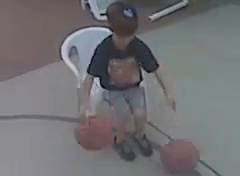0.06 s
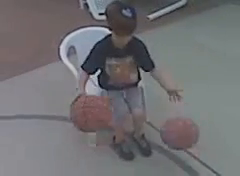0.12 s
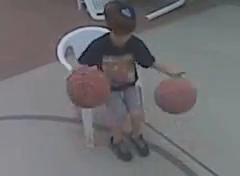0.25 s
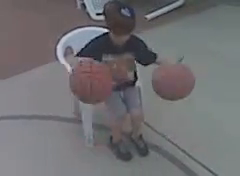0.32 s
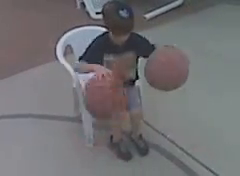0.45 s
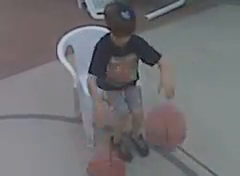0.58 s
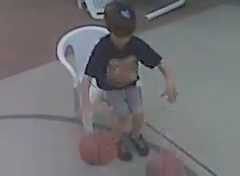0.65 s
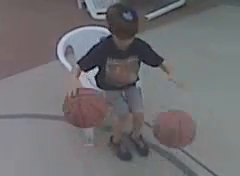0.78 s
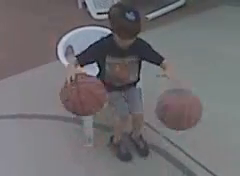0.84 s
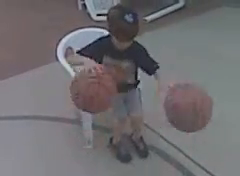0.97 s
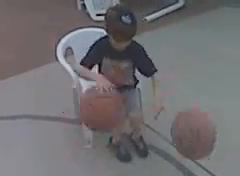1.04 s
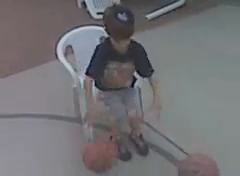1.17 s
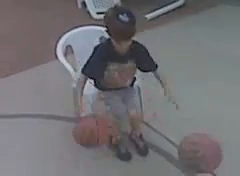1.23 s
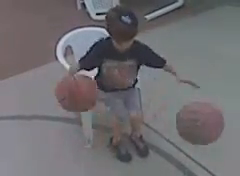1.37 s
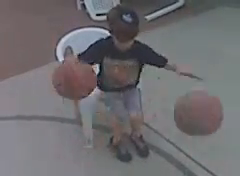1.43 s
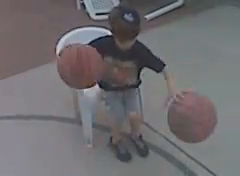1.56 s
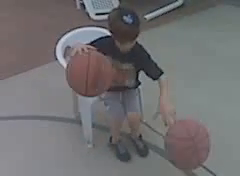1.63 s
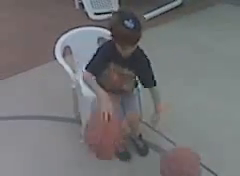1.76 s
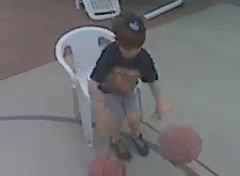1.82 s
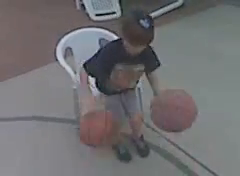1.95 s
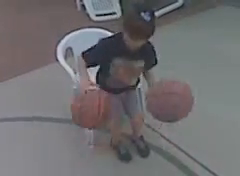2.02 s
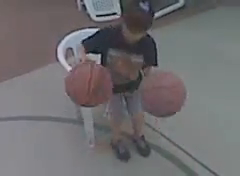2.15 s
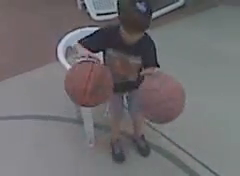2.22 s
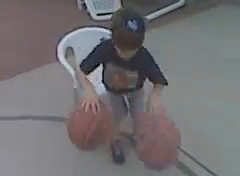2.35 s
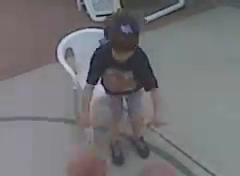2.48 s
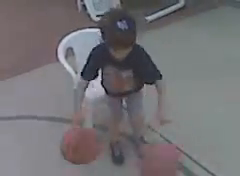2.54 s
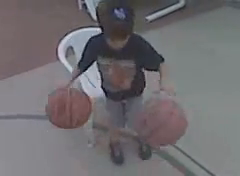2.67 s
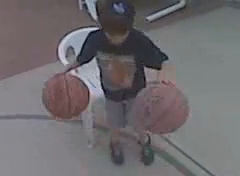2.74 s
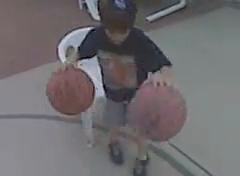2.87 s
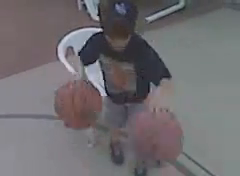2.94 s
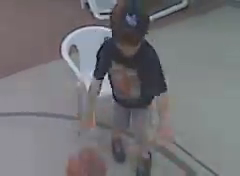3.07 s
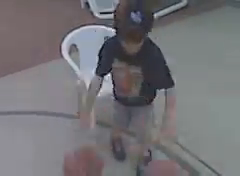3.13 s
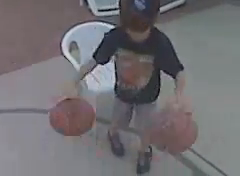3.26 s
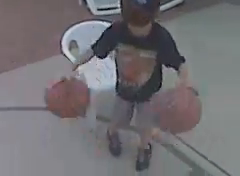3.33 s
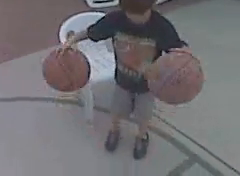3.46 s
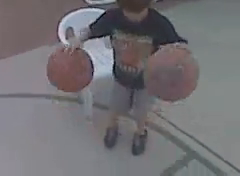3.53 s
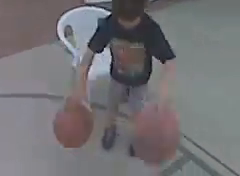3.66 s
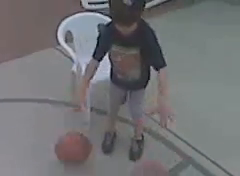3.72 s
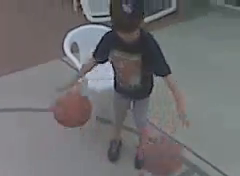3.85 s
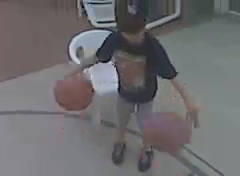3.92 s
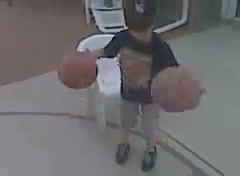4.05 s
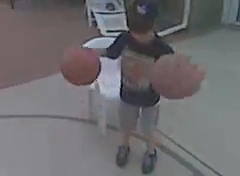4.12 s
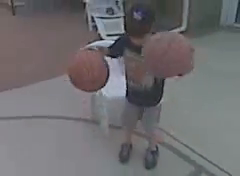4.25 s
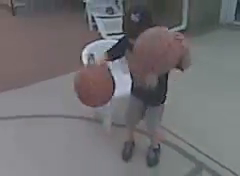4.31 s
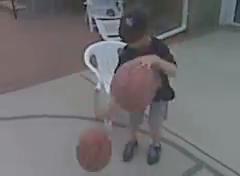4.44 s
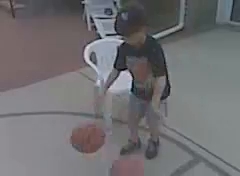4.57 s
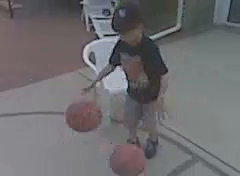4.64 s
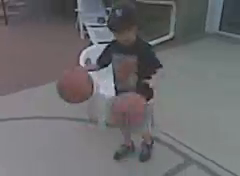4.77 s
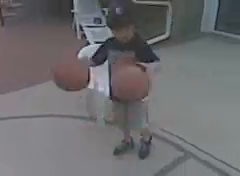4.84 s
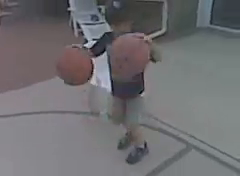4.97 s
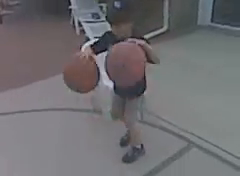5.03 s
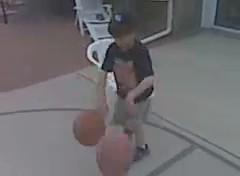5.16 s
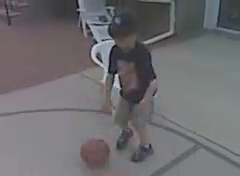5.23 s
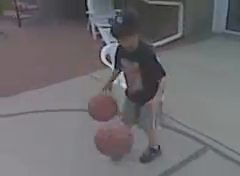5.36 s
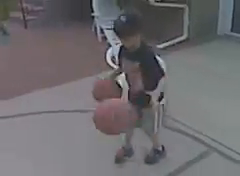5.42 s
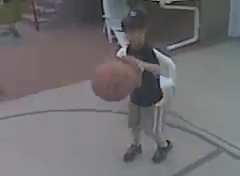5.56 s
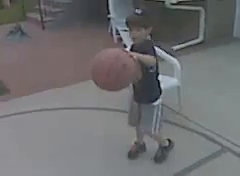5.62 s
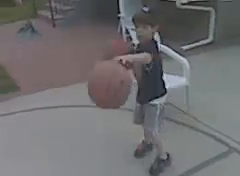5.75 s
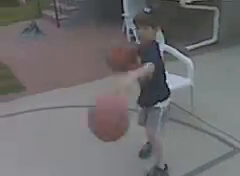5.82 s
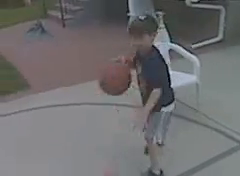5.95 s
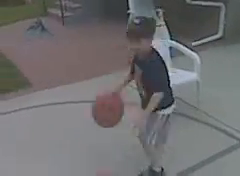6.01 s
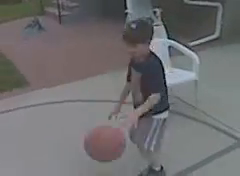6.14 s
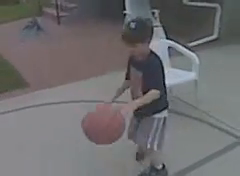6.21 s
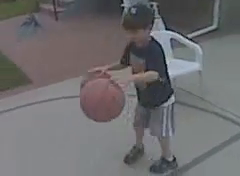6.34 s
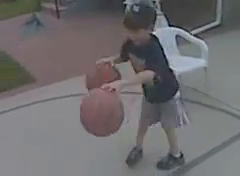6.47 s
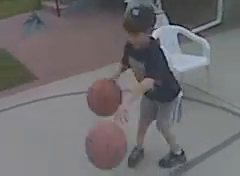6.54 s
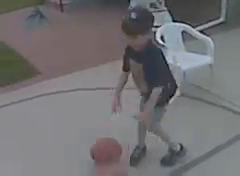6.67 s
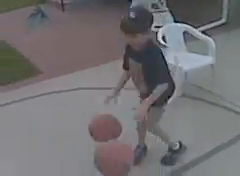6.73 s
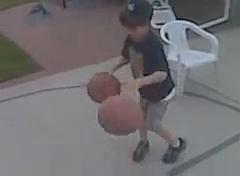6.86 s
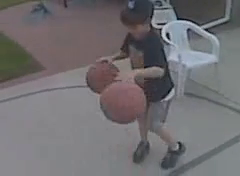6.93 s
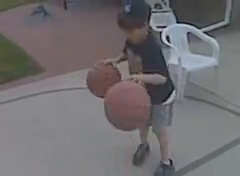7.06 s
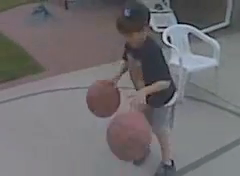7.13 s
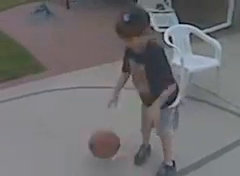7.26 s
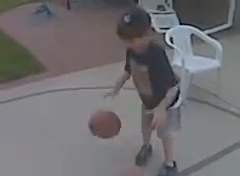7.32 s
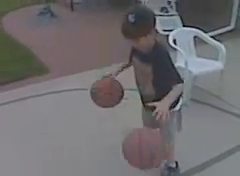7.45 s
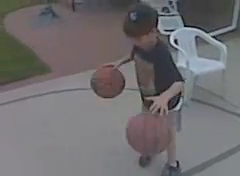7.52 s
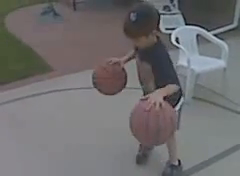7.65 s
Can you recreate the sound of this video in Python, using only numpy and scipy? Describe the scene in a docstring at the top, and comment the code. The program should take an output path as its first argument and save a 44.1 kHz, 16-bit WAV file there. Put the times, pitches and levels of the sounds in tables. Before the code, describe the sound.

Two basketballs are dribbled close by on outdoor concrete, landing almost together in a steady rhythm. Each bounce is a sharp slap with a thump, a hollow ring and a quick echo off nearby walls. After a couple of seconds, hands and shoes scuff between bounces and a distant bird whistles faintly over a soft hush. The small microphone sounds narrow and telephone-like, overloading on the loudest hits.

```python
"""Sharp, ringing bounces, close by: a child dribbles two basketballs on concrete beside a house.
Each one cracks as rubber slaps the ground, thumps as the shell flexes and rings in the air inside;
walls throw it back and the yard rings on. Hands and shoes scuff between bounces, and faint blips
and a whistling bird carry from far off over an outdoor hush. The narrow-band recorder overloads
on the loudest cracks."""
import sys
import numpy as np
from scipy import signal
from scipy.fft import rfft, irfft
from scipy.io import wavfile
from scipy.ndimage import uniform_filter1d

SR = 44100
rng = np.random.default_rng(int(sys.argv[2]) if len(sys.argv) > 2 else 0)


def to_wav(sig):
    """Store sig (one row per channel, or 1-D mono) as 16-bit WAV at the path in sys.argv[1].

    Samples outside -1..1 are clipped; the rate is SR.
    """
    pcm = np.clip(np.atleast_2d(sig), -1, 1) * 32767
    pcm = np.round(pcm).astype(np.int16)
    wavfile.write(sys.argv[1], SR, pcm.T)  # frames by channels


N = 339129


def amp(db):
    """Decibels to amplitude."""
    return 10 ** (np.asarray(db) / 20)


def unit_rms(x):
    """Scales x to an rms of one."""
    return x / np.sqrt(np.mean(x ** 2) + 1e-20)


def levelled(x, db, start_s, length_s):
    """Scales x to an rms level over one stretch of time."""
    part = x[round(start_s * SR):round((start_s + length_s) * SR)]
    return x * amp(db) / np.sqrt(np.mean(part ** 2) + 1e-20)


def add(mix, start_s, sound):
    """Lays a sound into the mix."""
    part = mix[round(start_s * SR):][:len(sound)]
    part += sound[:len(part)]


def bins(x):
    """Frequencies of the spectrum of x."""
    return np.fft.rfftfreq(len(x), 1 / SR)


def curve(points, hz):
    """Reads a breakpoint curve along log frequency."""
    f, value = np.transpose(points)
    return np.interp(np.log(hz + 1), np.log(f + 1), value)


def coloured(x, db):
    """Minimum-phase EQ with the given gain at each frequency bin."""
    log_gain = np.log(amp(np.maximum(db, -100)))
    mirrored = np.concatenate([log_gain, log_gain[-2:0:-1]])
    return irfft(rfft(x) * np.exp(np.conj(signal.hilbert(mirrored)))[:len(db)])


def narrow_db(hz):
    """Gain of the recorder's telephone-like band."""
    # treble roll-off: f/Hz, gain/dB
    band = [(3450, -2.5), (3650, -11.5), (3900, -19.5), (4300, -31), (4560, -45.5), (4750, -84.5)]
    return curve(band, hz)


def grit(t, depth_db, grain_samples):
    """Grainy noise whose level flickers at random."""
    noise = rng.standard_normal(len(t))
    flicker = unit_rms(uniform_filter1d(rng.standard_normal(len(t)), grain_samples))
    return noise * amp(depth_db * flicker)


def outdoor_hush(level_db=-45.5, patchy_db=4.0):
    """A steady bed of outdoor air with faint drifting patches."""
    # tone of the hush: f/Hz, level/dB
    air = [(30, -9), (100, -12), (200, -8), (300, -2), (600, -4), (1000, -2.5), (1600, -3), (2100, 2.5),
           (2400, 2), (2800, 3.5), (3400, -1)]
    hz, _, spectrum = signal.stft(rng.standard_normal(N), SR, nperseg=1024, noverlap=768)
    patches = uniform_filter1d(rng.standard_normal(spectrum.shape), 8, axis=0)
    patches = unit_rms(uniform_filter1d(patches, 14, axis=1))
    colour = curve(air, hz) + narrow_db(hz)
    spectrum *= amp(colour[:, None] + patchy_db * patches)
    hush = signal.istft(spectrum, SR, nperseg=1024, noverlap=768)[1][:N]
    return unit_rms(hush) * amp(level_db)


def smack_colour(hz, peak_hz, peak_db, width=0.11):
    """Tone of rubber on concrete; the ball's speed and spin give every smack its own hollow peak."""
    # spectrum of the slap: f/Hz, level/dB
    slap = [(30, -26.5), (80, -10), (160, -10), (350, -7), (450, -8), (580, -6.5), (800, -6.5),
            (1000, -4.5), (1350, 0.5), (1650, -2.5), (2050, 3.5), (2450, -1), (2800, 4), (3300, -2)]
    hollow = peak_db * np.exp(-(np.log((hz + 1) / peak_hz) / width) ** 2)
    return curve(slap, hz) + narrow_db(hz) + hollow


def crack(t, colour_db, decay_s):
    """Rubber slaps the ground: a fast-dying puff of coloured noise."""
    return coloured(rng.standard_normal(len(t)) * np.exp(-t / decay_s), colour_db)


def shell_thump(t, onset_s=.0035):
    """The shell flattens on the ground and springs back: a few strong cycles, then a faint hum."""
    # flexing modes of the rubber shell: f/Hz, level/dB, t60/s
    shell = [(166, -6.5, 0.04), (267.5, 5.5, 0.036), (289.4, -26.5, 0.56), (456, -4, 0.056)]
    flex = sum(amp(db - 60 * t / t60) * np.sin(2 * np.pi * hz * rng.uniform(0.93, 1.05) * t)
               for hz, db, t60 in shell)
    return np.interp(t - onset_s, t, flex * (1 - np.exp(-t / .0025)), left=0)


def ball_ring(t, longest_t60=.18):
    """The air in the ball rings; the strength of each mode depends on the spot that was hit."""
    # air modes inside a ball: f/Hz, level/dB, t60/s before the cap
    modes = [(1209, -1, 0.17), (1405, 5, 0.084), (2122, 6, 0.29), (2584, -2, 0.32), (2850, -9, 0.048),
             (3108, -9, .13)]
    ring = np.zeros(len(t))
    for hz, db, t60 in modes:
        envelope = amp(db + 0.83 * rng.standard_normal() - 60 * t / min(t60, longest_t60))
        ring += envelope * np.sin(2 * np.pi * (hz * rng.uniform(0.99, 1.008) * t + rng.random()))
    return ring * (1 - np.exp(-(t / 0.002) ** 2))


def yard_tail(t, colour_db, boom_db=8.5, boom_hz=275, late_db=-25, late_t60=0.59, rise_s=0.022):
    """Scattered returns swell, die fast, and leave a faint long tail with a low boom."""
    # reverb time of the yard: f/Hz, t60/s
    reverb = [(100, 0.51), (280, 0.56), (700, 0.31), (2000, 0.45), (3500, 0.45)]
    hz, frame_s, spectrum = signal.stft(grit(t, depth_db=1.9, grain_samples=90), SR, nperseg=256)
    early = amp(-60 * frame_s / curve(reverb, hz)[:, None])
    late = amp(late_db - 60 * frame_s / late_t60)
    tail = signal.istft(spectrum * np.hypot(early, late), SR, nperseg=256)[1][:len(t)]
    swell = 1 - np.exp(-(t / rise_s) ** 2)
    boom = boom_db * np.exp(-(np.log((bins(t) + 1) / boom_hz) / .19) ** 2)
    return coloured(tail * swell, colour_db + boom)


def bounce(force_db, crack_db, thump_db, smack_hz, smack_db, wall_m, walked_m):
    """One hit and its echoes; the force drives the rattle, the ring, the echoes and the tail."""
    # smaller reflectors round the court: delay/s, level/dB against the force
    reflectors = [(0.022, -5), (0.056, -14), (0.07, -12)]
    crack_s, ring_s = .004, .01  # stretches over which levels are set
    t = np.arange(2 ** 15) / SR
    brief = t[:2 ** 12]
    # each metre walked weakens the ring and strengthens the house echo
    ring_db = force_db - 0.56 - 3 * walked_m
    house_echo = (2 * wall_m / 343, 0.5 + 4.5 * walked_m)  # there and back at the speed of sound
    colour = smack_colour(bins(brief), smack_hz, smack_db)
    out = levelled(shell_thump(t), thump_db, 0, 2 * ring_s)
    add(out, 0, levelled(crack(brief, colour, decay_s=0.0025), crack_db, 0, crack_s))
    rattle = crack(brief, colour, decay_s=0.011)  # the shell rattles as it leaves the ground
    add(out, crack_s, levelled(rattle, ring_db, 0, ring_s))
    out += levelled(ball_ring(t), ring_db - 7, crack_s, ring_s)
    for delay_s, db in [house_echo] + reflectors:  # flat faces return the crack still sharp
        echo = crack(brief, colour, decay_s=0.0022)
        add(out, delay_s, levelled(echo, force_db + db, 0, crack_s))
    tail = yard_tail(t, smack_colour(bins(t), smack_hz, 0.38 * smack_db))
    return out + levelled(tail, force_db - 10.5, 0.045, 2 * ring_s)


def dribbling():
    """Both balls, bounce by bounce, as the child drifts toward the house."""
    # ball hits: t/s, force/dB, crack/dB, thump/dB, smack pitch/Hz, smack peak/dB
    hits = [(0.0359, -20, -21, -30.5, 2330, 3.5), (.121, -23, -15.5, -30.5, 2660, 11.5),
            (.656, -15.5, -23.5, -30, 1450, 4.5), (0.7258, -15.5, -9.5, -21.5, 1712, 13),
            (1.2194, -16, -8.5, -39, 1780, 12), (1.2256, -16, -4.5, -23, 1900, 2.5),
            (1.79, -20.5, -28, -41.5, 1115, 8), (1.9009, -16.5, -19, -27.5, 1776, 8),
            (2.519, -19, -12.5, -30, 3370, 10.5), (2.5279, -17, -5.5, -23, 3320, 5.5),
            (3.1526, -14.5, -16.5, -29.5, 1204, 6), (3.169, -16, -9, -34.5, 3230, 12),
            (3.777, -17, -18.5, -30.5, 2015, 8), (3.822, -17, -8.5, -23, 1405, 5.5),
            (4.564, -15, -10.5, -36.5, 2430, 11.5), (4.6657, -15.5, -19, -27.5, 1235, 1.5),
            (5.295, -15.5, -8.5, -17, 3280, 9), (6.057, -20.5, -21, -26.5, 2014, 5),
            (6.1703, -14, -14.5, -28, 1483, 14.5), (6.712, -19.5, -16, -35.5, 3160, 3.5),
            (6.731, -16.5, -11, -29, 2320, 9), (7.308, -17.5, -16.5, -42.5, 3220, 7),
            (7.342, -21.5, -14, -21, 885, 10.5)]
    # the child's path: t/s, distance to the house wall/m
    walk = [(3.2, 5.63), (4.6, 5.13), (6.1, 4.65), (7.3, 4.47)]
    out = np.zeros(N)
    for start_s, *hit in hits:
        wall_m = np.interp(start_s, *np.transpose(walk))
        add(out, start_s, bounce(*hit, wall_m, walked_m=walk[0][1] - wall_m))
    return out


def glides(notes, waver=0.011, rasp=.35, flutter_hz=130):
    """Wavering, slightly raspy tones that slide from one pitch to another."""
    out = np.zeros(N)
    smooth = signal.butter(4, flutter_hz, fs=SR, output="sos")
    for start_s, length_s, db, start_hz, end_hz in notes:
        progress = np.linspace(0, 1, round(length_s * SR))
        wobble = unit_rms(signal.sosfilt(smooth, rng.standard_normal((2, SR))))
        drift, flutter = wobble[:, -len(progress):]
        hz = start_hz * (end_hz / start_hz) ** progress * (1 + waver * drift)
        envelope = np.sin(np.pi * progress) * (1 + rasp * flutter)
        tone = np.sin(2 * np.pi * np.cumsum(hz) / SR)
        add(out, start_s, amp(db) * unit_rms(envelope * tone))
    return out


def distant_blips():
    """Faint low blips from far away."""
    # blips: t/s, length/s, level/dB, start f/Hz, end f/Hz
    blips = [(2.136, 0.032, -51.5, 495, 487), (2.353, 0.02, -47.5, 472, 490),
             (2.355, 0.017, -46, 1390, 1400)]
    return glides(blips)


def scuffs(peak_db=20):
    """Palms rub the balls and shoes rub concrete: gritty strokes with a rubbery, squeaky peak."""
    # rubs: t/s, level/dB, length/s, centre f/Hz
    rubs = [(2.262, -42, .032, 2900), (2.936, -34, 0.048, 2550), (3.496, -42, 0.025, 2820),
            (3.5178, -28.5, 0.016, 2840), (4.032, -43.5, 0.17, 2820), (4.199, -35, 0.0084, 2330),
            (4.353, -39.5, 0.0071, 2460), (4.467, -45, 0.21, 2700), (5.024, -35, 0.084, 2800),
            (5.053, -26.5, 0.044, 2900), (5.41, -26.5, 0.017, 2130), (5.429, -29.5, 0.042, 2630),
            (5.458, -30.5, 0.018, 2570), (6.123, -30.5, 0.041, 2000), (6.685, -40, .06, 2743),
            (7.118, -40, 0.02, 2450)]
    out = np.zeros(N)
    t = np.arange(2 ** 14) / SR
    hz = bins(t)
    for start_s, db, length_s, centre_hz in rubs:
        stroke = (1 - np.exp(-t / 0.00068)) * np.exp(-(t / length_s) ** 2)
        friction = grit(t, depth_db=6.1, grain_samples=60) * stroke
        squeak = peak_db * np.exp(-np.log2((hz + 1) / centre_hz) ** 2)  # an octave to either side
        add(out, start_s, levelled(coloured(friction, squeak + narrow_db(hz)), db, 0, length_s))
    return out


def bird():
    """A far-off bird whistles short, sliding notes."""
    # whistles: t/s, length/s, level/dB, start f/Hz, end f/Hz
    whistles = [(2.398, 0.043, -43, 3330, 2900), (2.745, 0.065, -40.5, 3400, 2520),
                (2.868, 0.039, -42, 2720, 2420), (3.37, 0.092, -37.5, 2905, 2750),
                (4.02, 0.071, -42, 2760, 2840), (4.85, 0.17, -46, 2840, 2800),
                (5.86, 0.14, -46, 2784, 2930), (7.53, 0.053, -43.5, 3060, 2900),
                (7.59, .17, -45.5, 2220, 2750)]
    return glides(whistles)


def scattered(x, wet_db, t60):
    """Adds the yard's diffuse returns to a quieter sound."""
    t = np.arange(SR) / SR
    tail = rng.standard_normal(SR) * amp(-60 * t / t60) * (t > .012)
    return x + amp(wet_db) * signal.fftconvolve(x, tail / np.linalg.norm(tail))[:N]


def scene():
    """Balls and scuffs up front, the bird and the blips far off, over the outdoor hush."""
    near = scattered(scuffs(), wet_db=-8.0, t60=0.38)
    far = scattered(bird() + distant_blips(), wet_db=-7, t60=.3)
    return (dribbling() + near + far + outdoor_hush())[None]


def record(dry, ceiling=0.79, low_cut_hz=55, high_cut_hz=16300):
    """A small microphone loses deep bass; the loudest cracks clip, spitting treble above the band."""
    thin = signal.sosfilt(signal.butter(1, low_cut_hz, "high", fs=SR, output="sos"), dry)
    clipped = np.clip(thin, -ceiling, ceiling)
    high_cut = signal.firwin(511, high_cut_hz, window=("kaiser", 9), fs=SR)
    return signal.oaconvolve(clipped, high_cut[None], "same")


dry = scene()
out = record(dry)
to_wav(out)
```